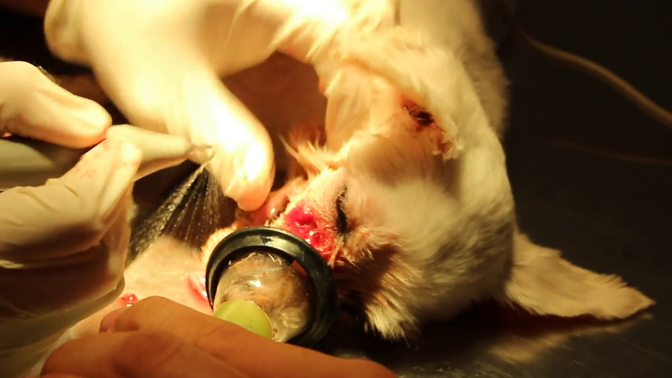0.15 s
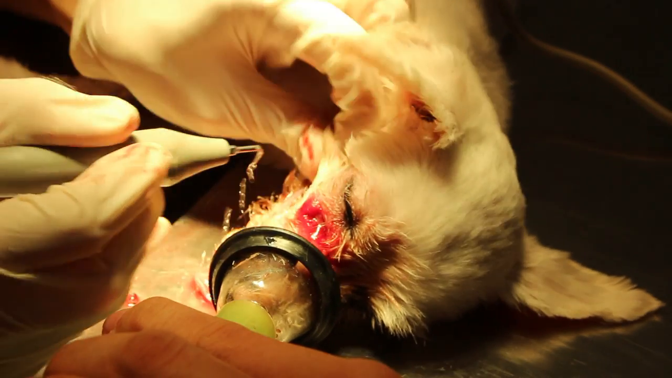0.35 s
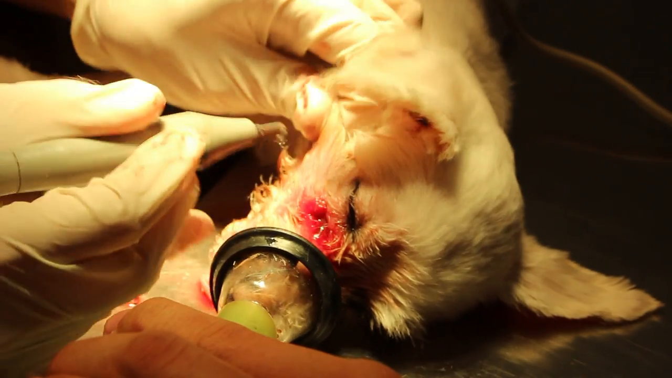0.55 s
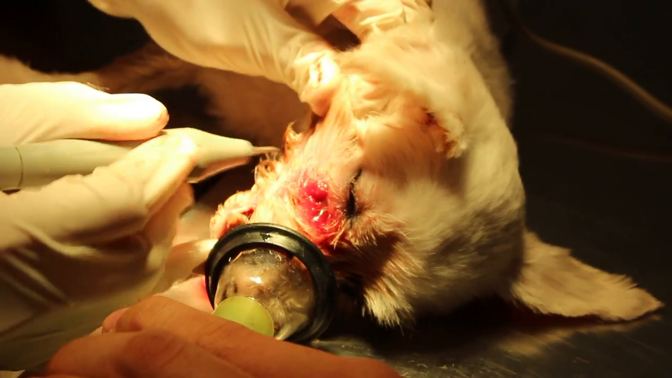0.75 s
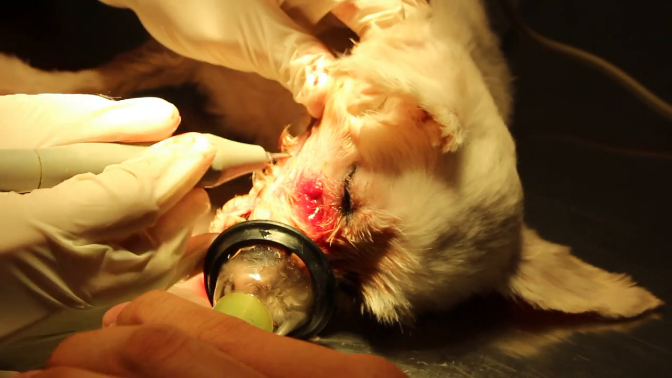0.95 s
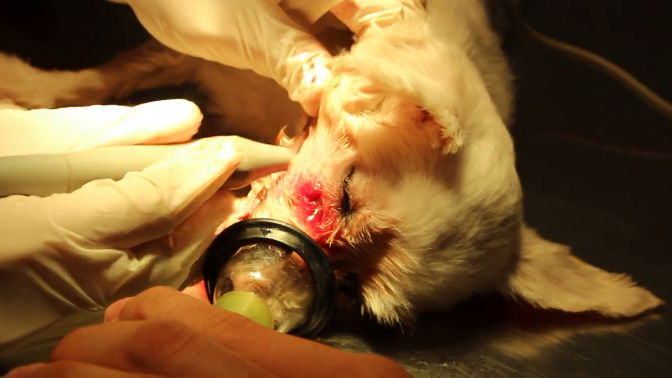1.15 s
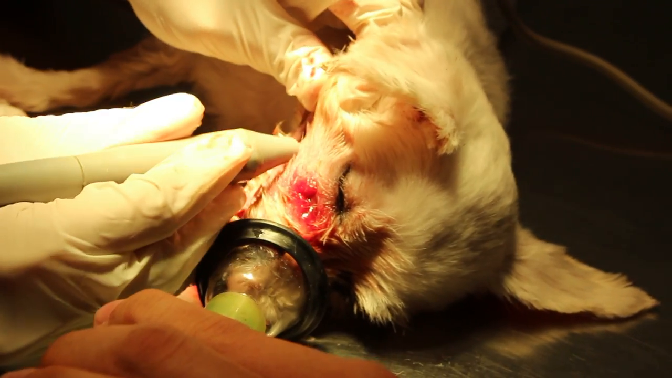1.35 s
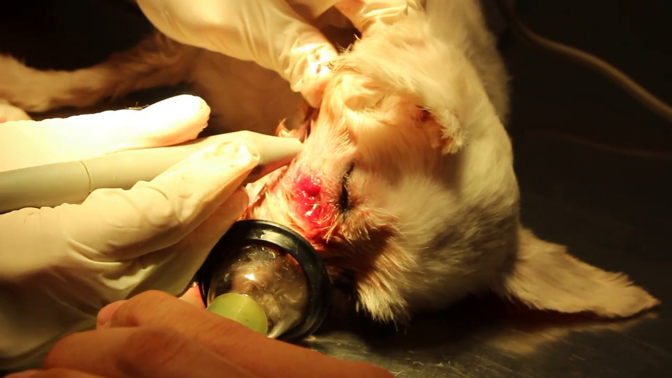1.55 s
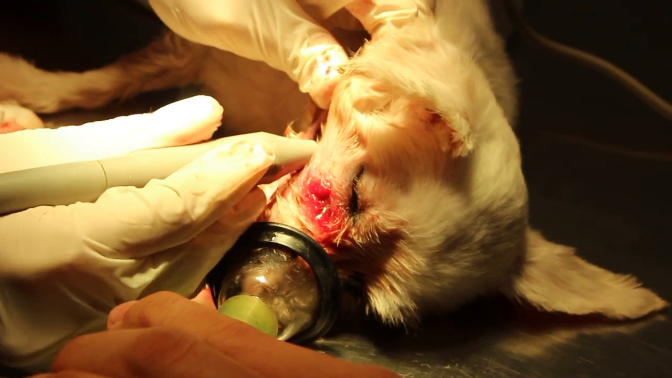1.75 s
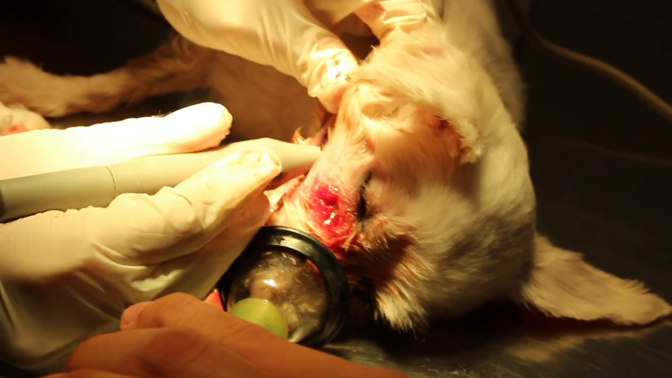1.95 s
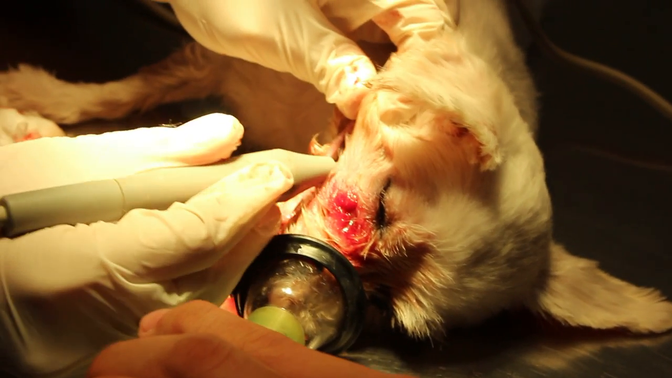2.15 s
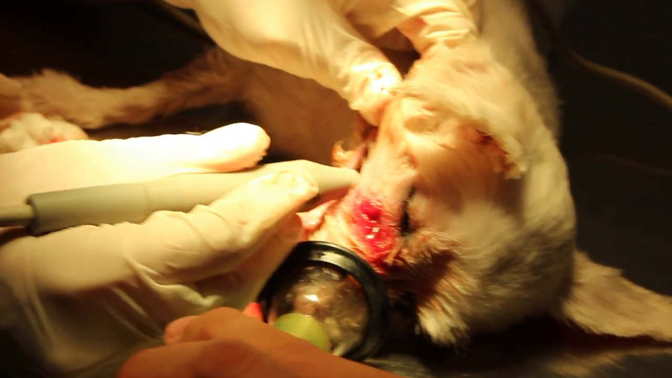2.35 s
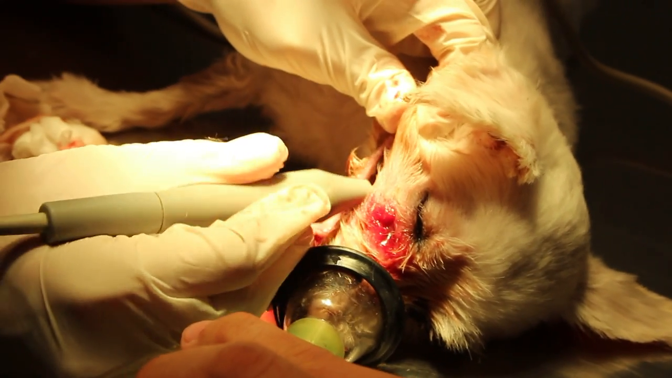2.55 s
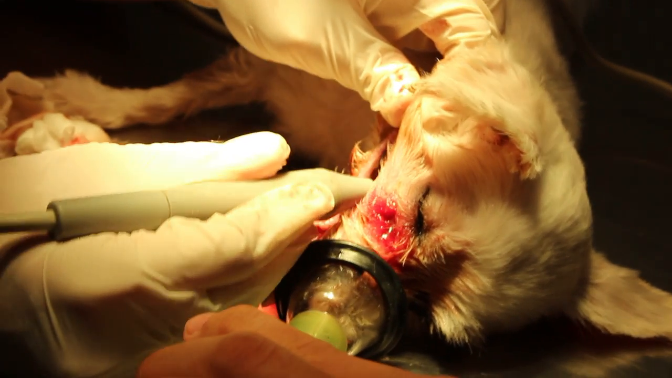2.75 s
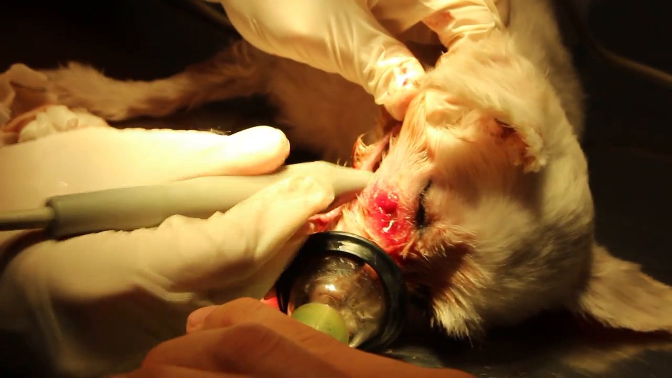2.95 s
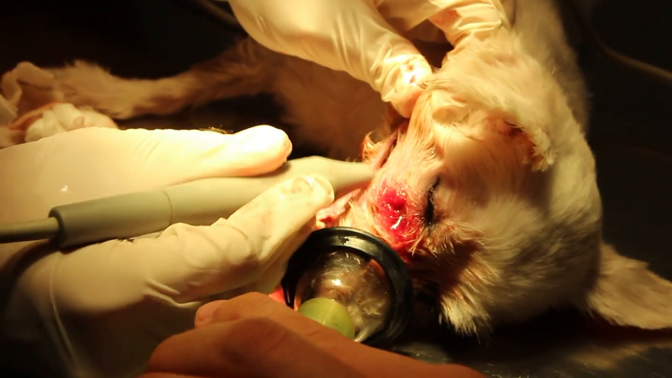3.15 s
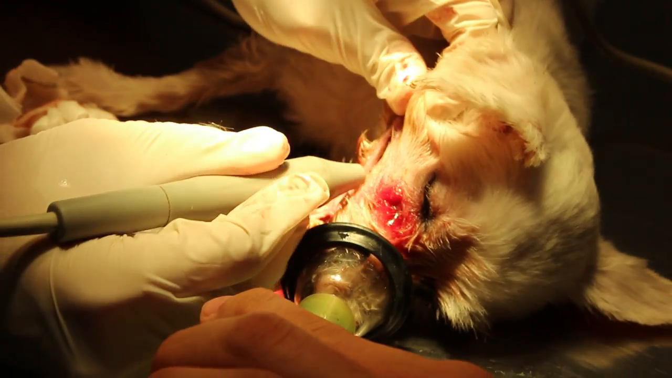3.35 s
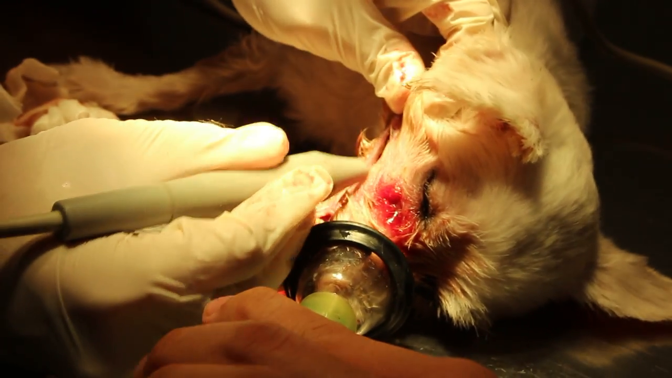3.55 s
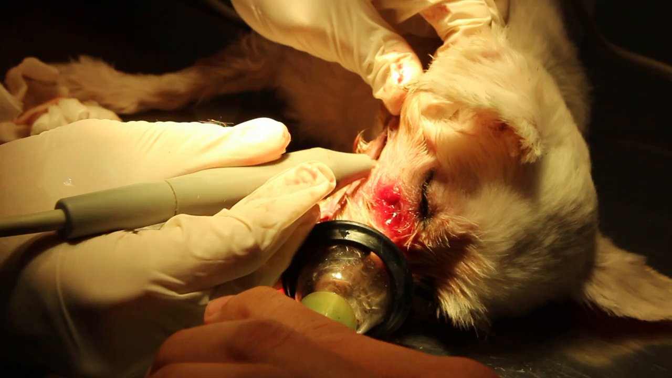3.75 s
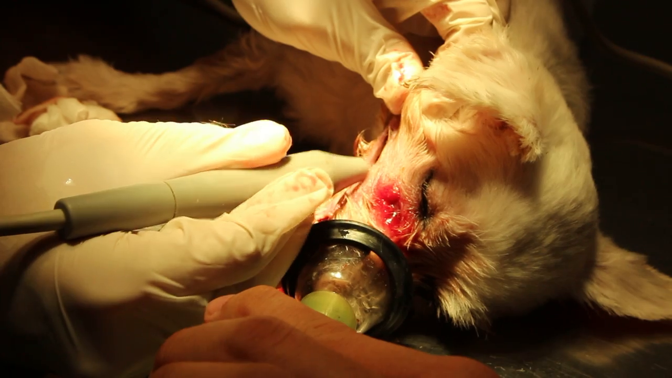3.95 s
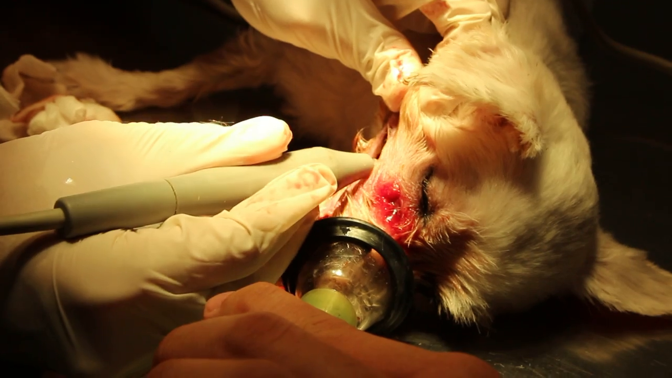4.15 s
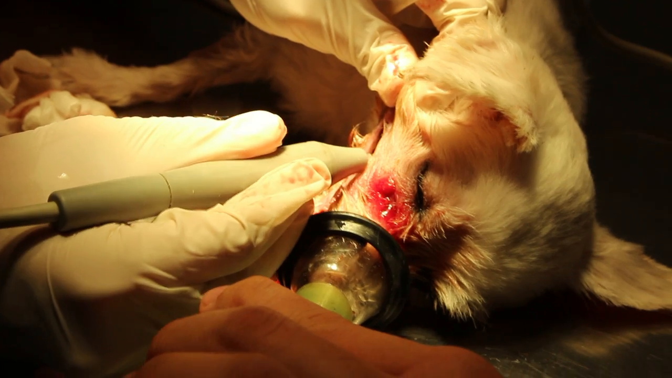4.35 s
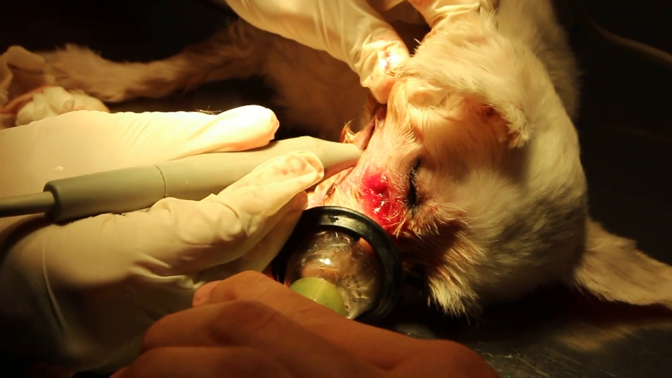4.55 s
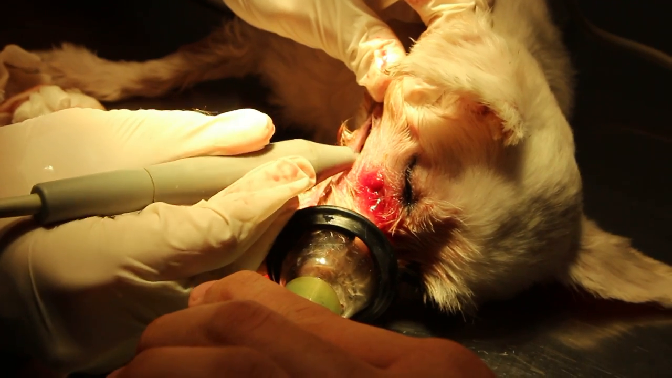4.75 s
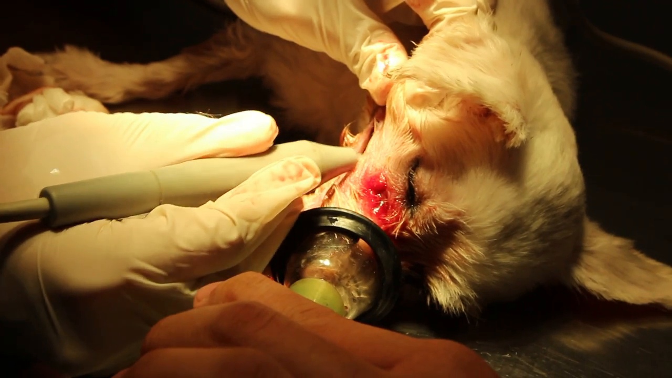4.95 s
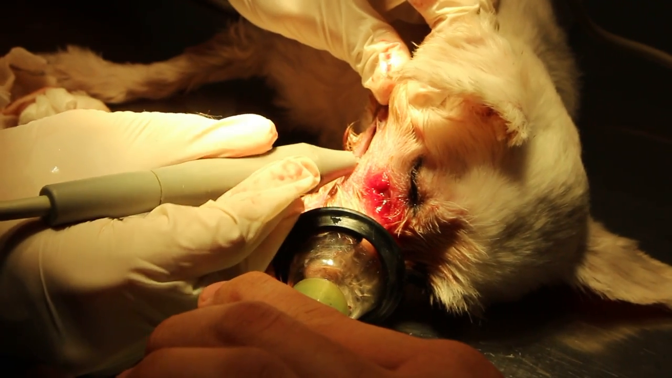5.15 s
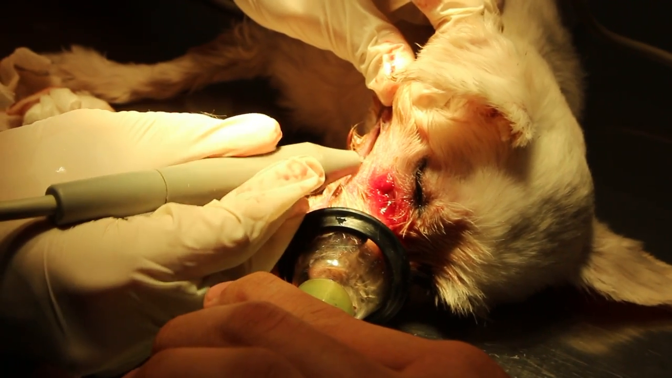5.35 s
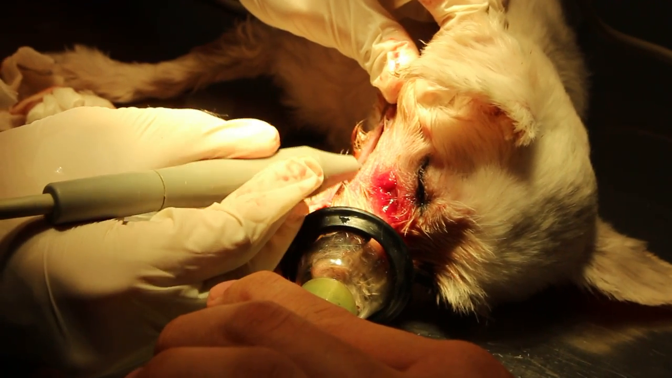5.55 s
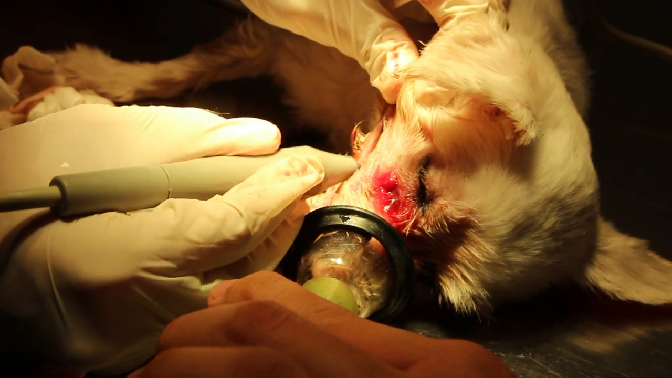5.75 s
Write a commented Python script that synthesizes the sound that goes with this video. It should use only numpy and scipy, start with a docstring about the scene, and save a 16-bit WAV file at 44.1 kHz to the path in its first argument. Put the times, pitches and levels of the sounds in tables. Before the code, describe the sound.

An ultrasonic dental scaler squeals, chatters and scrapes on teeth after a burst of water mist and pedal clacks, over low room hum.

```python
"""An ultrasonic dental scaler in a small tiled clinic room.
First ventilation and machines hum (shaped noise, all along) and a water mist (bright noise) dies away.
Foot pedal clacks follow (rings, thuds and snaps); at the second and third, close together, the mist bursts back.
From 1.2 s the steel tip chatters on the teeth: gliding tones squeal, noise rasps and rings the tip, a high
whine comes and goes, and the sound jumps as the tip catches; two more clacks fall during this."""
import sys
import numpy as np
from scipy import signal
from scipy.fft import rfft, irfft, next_fast_len
from scipy.io import wavfile
from scipy.ndimage import uniform_filter1d, map_coordinates

SR = 44100
rng = np.random.default_rng(int(sys.argv[2]) if len(sys.argv) > 2 else 0)


def int16_out(signal):
    """Quantize to a 16-bit WAV file."""
    q = np.round(np.clip(np.atleast_2d(signal).T, -1, 1) * 32767)
    wavfile.write(sys.argv[1], SR, q.astype(np.int16))


N = 255339  # length of the scene in samples


def amp(db):
    """Gain of a level in dB."""
    return 10 ** (np.asarray(db) / 20)


def unit(x):
    """x scaled to an rms (average strength) of 1."""
    return x / np.sqrt(np.mean(np.abs(x) ** 2) + 1e-20)


def along(points, hz):
    """Read a curve of (frequency, value) points at hz, on a log frequency axis."""
    f, v = np.transpose(points)
    return np.interp(np.log(hz + 1), np.log(f + 1), v)


def curves(rows):
    """One value per sample for each column after the time."""
    times, *columns = np.transpose(rows)
    return [np.interp(np.arange(N) / SR, times, column) for column in columns]


def wobble(rate, size=N):
    """A smooth random curve with rate random points a second."""
    points = rng.standard_normal(int(size * rate / SR) + 4)
    return map_coordinates(points, [np.arange(size) * rate / SR])


def filtered(x, response):
    """x times a complex response of frequency."""
    m = next_fast_len(N + SR // 2)
    return irfft(rfft(x, m) * response(np.fft.rfftfreq(m, 1 / SR)), m)[..., :N]


def hiss(spectrum, patchy_db, channels):
    """Coloured noise of rms 1, with random louder and softer patches in time and frequency."""
    z = signal.stft(rng.standard_normal((channels, N)), nperseg=256)[2]
    field = uniform_filter1d(rng.standard_normal(z.shape[1:]), size=3, axis=0)
    field = uniform_filter1d(field, size=8, axis=1)
    x = signal.istft(z * amp(patchy_db * unit(field)), nperseg=256)[1][:, :N]
    return unit(filtered(x, lambda hz: amp(along(spectrum, hz))))


def ports(pair, lean, lead):
    """Level and phase differences between the two microphone ports, half given to each side."""
    half = np.array([[.5], [-.5]])
    return filtered(pair, lambda hz: amp(half * along(lean, hz)) * np.exp(1j * half * along(lead, hz)))


# colour of the hum: (frequency [Hz], relative level [dB])
HUM_COLOUR = [(20, -35), (35, -16), (52, -12), (63, 2.5), (80, -5.5), (100, -7.5), (112, -7), (130, 4),
              (165, -12.5), (230, -10.5), (310, -13), (450, -13.5), (900, -20), (1600, -28.5),
              (5000, -37.5), (16000, -51.5)]
# likeness of the hum at the two ports: (frequency [Hz], likeness [0-1])
HUM_LIKENESS = [(60, 1), (300, 0.99), (800, 0.83), (1500, 0.98), (3000, 0)]
# level difference of the hum: (frequency [Hz], left minus right [dB])
HUM_LEVEL_DIFFERENCE = [(60, -1.5), (240, 2.5), (950, 2), (3770, -0.5), (15000, 0.0)]
# phase difference of the hum: (frequency [Hz], left minus right [rad])
HUM_PHASE_DIFFERENCE = [(50, 1), (130, 0.77), (300, 0.45), (700, 0.14)]


def hum():
    """Ventilation and machine rumble: noise nearly alike at both ports in the bass."""
    def turn(hz):
        return np.arccos(np.clip(along(HUM_LIKENESS, hz), 0, 1)) / 2
    noises = hiss(HUM_COLOUR, patchy_db=1.24, channels=2)
    # the more unlike the ports, the more of the second noise goes in with opposite signs
    mid, side = filtered(noises, lambda hz: [np.cos(turn(hz)), np.sin(turn(hz))])
    return amp(-39) * ports(np.array([mid + side, mid - side]), HUM_LEVEL_DIFFERENCE, HUM_PHASE_DIFFERENCE)


# strength of the water mist: (time [s], level [dB])
MIST_LEVEL = [(0.0, -42.5), (0.11, -42), (0.13, -38), (0.3, -65), (.45, -90), (1.035, -78), (1.05, -29),
              (1.1, -36), (1.19, -40.5), (1.4, -70), (5.79, -105)]
# colour of the water mist: (frequency [Hz], relative level [dB])
MIST_COLOUR = [(880, -40), (1500, -6), (2040, -2), (2300, -4), (2800, -1.5), (9190, -8.5), (16000, -22)]


def spray():
    """Fine water mist from the handpiece, a bright noise: it stops, then returns with the pedal."""
    return amp(curves(MIST_LEVEL)[0]) * hiss(MIST_COLOUR, patchy_db=.8, channels=2)


# pedal clacks: (time [s], level before a 4.5 dB cut of the dry sound [dB], ring pitch [Hz],
# snap against ring [dB], thud against ring [dB], room send against the uncut level [dB],
# time for the ring to fall 60 dB [s])
PEDAL_CLACKS = [(0.11, -31, 1033, -26, -6.5, 3.5, 0.037), (1.034, -28.5, 963, -3, -16, -1, 0.077),
                (1.044, -18, 1305, -13, -25, 2.5, 0.027), (1.447, -16, 1356, -20, -9, -5.5, 0.016),
                (3.449, -27, 1580, -20, -15, -3.5, 0.024)]


def pedal():
    """Plastic clacks: a short ring in two modes, a low thud and a broad snap; dry and as sent to the walls."""
    out = np.zeros((2, N + SR))
    t = np.arange(SR // 4) / SR
    for start, db, hz, snap_db, thud_db, room_db, fall_s in PEDAL_CLACKS:
        two_modes = np.sin(2 * np.pi * hz * t) + 0.43 * np.sin(2 * np.pi * 1.17 * hz * t)
        ring = two_modes * amp(-60 * t / fall_s)
        thud = amp(thud_db - 60 * t / 0.04) * np.sin(2 * np.pi * 450 * t)
        snap = amp(snap_db - 60 * t / 0.017) * rng.standard_normal(len(t))
        at = round(start * SR)
        out[:, at:at + len(t)] += amp([[db - 4.5], [db + room_db]]) * (ring + thud + snap)
    return out[:, :N]


# how long the walls ring: (frequency [Hz], time to fall 60 dB [s])
WALL_DECAY = [(300, 0.45), (1500, 0.49), (5000, 0.18), (14000, 0.038)]


def room(x, width):
    """Quick echoes off the steel table, then the walls, where each frequency dies at its own speed."""
    hz, t, z = signal.stft(rng.standard_normal((2, SR // 2)), SR, nperseg=256)
    walls = amp(-60 * t / along(WALL_DECAY, hz)[:, None])
    steel_table = amp(1 - 60 * t / 0.027)
    mid, side = signal.istft(z * (walls + steel_table), SR, nperseg=256)[1]
    tail = np.array([mid + width * side, mid - width * side])
    delayed = np.pad(x, (60, 0))[None]  # samples
    return signal.fftconvolve(delayed, tail / np.linalg.norm(tail[0]), axes=1)[:, :N]


def squeal(hz, db, smear, drift_hz, blur_hz):
    """A tone that drifts and flutters; chaotic contact blurs it into a narrow noise."""
    n = len(smear)
    pitch = hz + drift_hz * (.3 + 1.4 * smear) * wobble(60, size=n)
    carrier = np.exp(2j * np.pi * np.cumsum(pitch) / SR)
    flutter = unit(amp(3.3 * wobble(110, size=n)))
    blur = unit(wobble(blur_hz, size=n) + 1j * wobble(blur_hz, size=n))
    mixture = np.sqrt(1 - smear) * flutter + np.sqrt(smear) * blur
    return np.sqrt(2) * amp(db) * np.real(carrier * mixture)


# squeals of the tip, each one gliding tone:
# (start [s], length [s], first pitch [Hz], last pitch [Hz], level [dB])
TIP_SQUEALS = [(1.201, 0.022, 3140, 3123, -27.5), (1.2, 0.026, 7610, 7830, -19),
               (1.197, 0.047, 10890, 10880, -25.5), (1.244, 0.055, 7700, 7700, -39),
               (1.268, 0.04, 7820, 7840, -31), (1.27, 0.038, 3310, 3250, -40),
               (1.315, 0.058, 7580, 7750, -22), (1.318, 0.065, 3270, 3370, -34.5),
               (1.334, 0.047, 11000, 10990, -25.5), (1.384, 0.074, 7680, 7640, -20),
               (1.391, 0.15, 3320, 3330, -35), (1.417, 0.16, 11070, 10880, -30),
               (1.472, 0.045, 7650, 7690, -21), (1.556, 0.12, 7690, 7735, -17.5),
               (1.562, 0.14, 3250, 3150, -27.5), (1.571, 0.13, 10940, 10960, -23.5),
               (1.579, 0.031, 7350, 7460, -24), (1.677, 0.046, 3164, 3263, -31.5),
               (1.68, 0.042, 7690, 7710, -20.5), (1.719, 0.065, 3720, 3700, -36.5),
               (1.761, 0.027, 7700, 7640, -25), (2.002, 0.044, 4390, 4410, -37.5),
               (2.136, 0.062, 9900, 9900, -31), (2.212, 0.093, 7040, 7030, -35),
               (2.216, 0.055, 7990, 7900, -30.5), (2.242, 0.15, 11120, 11120, -25.5),
               (2.272, 0.03, 7700, 7680, -22), (2.292, 0.077, 7374, 7575, -18),
               (2.335, 0.048, 3550, 3980, -31), (2.39, 0.027, 7480, 7490, -33),
               (2.403, 0.046, 6500, 6590, -26.5), (2.409, 0.027, 3266, 3310, -32),
               (2.458, 0.041, 6940, 6880, -27), (2.504, 0.03, 7070, 6950, -39),
               (2.516, 0.066, 8400, 8260, -33), (2.596, 0.031, 10100, 9700, -28),
               (2.63, 0.033, 7740, 8070, -29), (2.632, 0.06, 4160, 4130, -27),
               (2.748, 0.043, 3960, 3980, -30), (2.756, 0.057, 10000, 10100, -33),
               (2.853, 0.052, 7180, 7370, -29), (2.89, 0.036, 6900, 6910, -23.5),
               (2.948, 0.035, 10000, 9780, -24), (2.953, 0.049, 6860, 6850, -27.5),
               (2.976, 0.027, 9100, 9330, -26), (3.15, 0.034, 6960, 6840, -19.5),
               (3.154, 0.027, 7870, 7900, -25), (3.184, 0.02, 7470, 7630, -29),
               (3.19, 0.095, 11670, 11440, -37.5), (3.294, 0.034, 7680, 7600, -28),
               (3.297, 0.042, 10640, 10960, -33), (3.307, 0.034, 3110, 3115, -30),
               (3.347, 0.046, 7880, 8000, -21), (3.377, 0.047, 8500, 8360, -26),
               (3.387, 0.1, 10800, 10810, -29.5), (3.413, 0.039, 7900, 8000, -29),
               (3.405, 0.041, 2970, 2960, -29.5), (3.55, 0.045, 7420, 7380, -23),
               (3.556, 0.044, 3426, 3410, -29), (3.59, 0.036, 7900, 7800, -29),
               (3.642, 0.07, 6960, 6870, -30.5), (3.699, 0.035, 10590, 10770, -27.5),
               (3.7, 0.042, 2947, 3106, -31), (3.705, 0.039, 8200, 8140, -24),
               (3.769, 0.058, 7600, 7700, -34), (3.832, 0.094, 4250, 4460, -33.5),
               (3.89, 0.058, 6910, 6820, -27), (3.915, 0.047, 11420, 11300, -27),
               (3.929, 0.13, 3334, 3093, -29.5), (3.977, 0.029, 7660, 7780, -20),
               (3.983, 0.031, 10970, 10840, -28.5), (4.028, 0.037, 7600, 7630, -34),
               (4.053, 0.069, 8750, 8580, -30), (4.11, 0.07, 8550, 8400, -35),
               (4.177, 0.11, 11500, 11480, -32), (4.191, 0.1, 6860, 6900, -28),
               (4.221, 0.047, 8130, 8220, -26), (4.229, 0.053, 3440, 3435, -27),
               (4.268, 0.035, 7320, 7220, -20.5), (4.265, 0.04, 11130, 11070, -24),
               (4.298, 0.047, 3880, 3570, -28), (4.334, 0.031, 11430, 11420, -28.5),
               (4.354, 0.076, 6890, 6910, -26.5), (4.373, 0.17, 11430, 11530, -28),
               (4.407, 0.067, 3140, 3095, -28), (4.422, 0.15, 6560, 6700, -30.5),
               (4.476, 0.053, 8550, 8280, -24), (4.481, 0.044, 3090, 3210, -25.5),
               (4.522, 0.086, 11340, 11370, -30.5), (4.532, 0.086, 3300, 3320, -28.5),
               (4.58, 0.0377, 3810, 4000, -33), (4.65, 0.051, 9820, 9800, -31),
               (4.714, 0.083, 3314, 3140, -28), (4.718, 0.058, 7650, 7750, -18.5),
               (4.719, 0.067, 10900, 10680, -32), (4.787, 0.117, 11350, 11370, -27),
               (4.804, 0.088, 6990, 6800, -21.5), (4.928, 0.19, 11460, 11450, -30),
               (4.933, 0.045, 8100, 8210, -23.5), (4.941, 0.065, 3420, 3490, -23),
               (5.009, 0.089, 6540, 6570, -32.5), (5.021, 0.042, 3280, 3340, -32),
               (5.049, 0.046, 6910, 6910, -27.5), (5.072, 0.021, 7600, 7550, -28.5),
               (5.075, 0.022, 8000, 7950, -29), (5.078, 0.044, 3740, 3820, -22),
               (5.099, 0.025, 7700, 7770, -33), (5.141, 0.047, 3900, 3946, -32.5),
               (5.226, 0.031, 4750, 4790, -27.5), (5.232, 0.048, 11710, 11900, -35),
               (5.25, 0.04, 3910, 3990, -27.5), (5.362, 0.044, 8700, 8700, -31),
               (5.4, 0.036, 8970, 8910, -32), (5.402, 0.031, 11860, 11590, -31),
               (5.424, 0.035, 7310, 7200, -25.5), (5.44, 0.045, 11440, 11450, -29),
               (5.444, 0.056, 3850, 3860, -29), (5.464, 0.088, 6660, 6620, -28.5),
               (5.478, 0.032, 7730, 7560, -19.5), (5.562, 0.057, 7150, 7290, -20),
               (5.579, 0.06, 3850, 3950, -35.5), (5.701, 0.04, 7810, 7780, -26),
               (5.704, 0.05, 10770, 11010, -32.5), (5.71, 0.064, 3080, 3130, -35.5),
               (5.75, 0.038, 7820, 7880, -30)]


def squeals(smear):
    """Every squeal swells, holds while it glides, and fades; summed as low, middle and high tones."""
    swell_s, longest_s = .05, .4  # room for a squeal's swell, and for all of it
    n = round(longest_s * SR)
    out = np.zeros((3, N + n))
    smear = np.pad(smear, (0, n), "edge")
    t = np.arange(n) / SR - swell_s
    for start, length, first_hz, last_hz, db in TIP_SQUEALS:
        at = round((start - swell_s) * SR)
        # swells at 702 dB/s and fades at 800 dB/s
        level = db + 702 * np.minimum(t, 0) - 800 * np.maximum(t - length, 0)
        glide = np.interp(t, [0, length], [first_hz, last_hz])
        blurred = np.clip(1.1 * smear[at:at + n] - .15, 0, 1)
        band = np.searchsorted([5000, 8000], first_hz)
        out[band, at:at + n] += squeal(glide, level, blurred, drift_hz=34.1, blur_hz=450.2)
    return out[:, :N]


def mixed_tones(low_tone, main_tone):
    """One-sided contact adds doubles, sums and differences of the two chief tones, kept above 3500 Hz."""
    return amp(-2) * filtered((low_tone + 0.48 * main_tone) ** 2, lambda hz: hz > 3500)


# scrapes of the tip over tartar: (middle [s], length [s], low rasp level [dB], high rasp level [dB])
TARTAR_SCRAPES = [(1.207, 0.05, -41, -31), (1.287, 0.076, -39, -32.5), (1.415, 0.11, -39.5, -37),
                  (1.547, 0.083, -38.5, -38), (1.657, 0.033, -44, -42), (1.76, 0.041, -36.5, -30),
                  (1.867, 0.046, -30, -26), (2.005, 0.026, -52, -33), (2.06, 0.08, -39, -31),
                  (2.16, 0.036, -37, -30), (2.258, 0.062, -44.5, -35), (2.501, 0.096, -27, -26),
                  (2.597, 0.35, -29.5, -27), (2.683, 0.145, -30.5, -31), (2.813, 0.032, -29.5, -26.5),
                  (2.898, 0.062, -28, -29), (2.999, 0.12, -30, -28), (3.097, 0.06, -37, -32),
                  (3.192, 0.095, -39.5, -27), (3.321, 0.04, -42, -37), (3.433, 0.12, -34, -25),
                  (3.586, 0.097, -30, -23), (3.729, 0.066, -34.5, -29), (3.915, 0.096, -34, -33),
                  (4.083, 0.1, -47, -28), (4.154, 0.083, -36.5, -34), (4.317, 0.11, -33, -30.5),
                  (4.472, 0.15, -34.5, -30.5), (4.583, 0.032, -33, -27.5), (4.714, 0.059, -36.5, -33),
                  (4.874, 0.093, -35, -33.5), (4.976, 0.067, -38, -30.5), (5.106, 0.111, -29.5, -28),
                  (5.257, 0.088, -29.5, -25.5), (5.4, 0.05, -38, -35), (5.479, 0.087, -29, -25.5),
                  (5.619, 0.089, -34, -29), (5.752, 0.076, -37, -30)]


def rasp_db():
    """Levels of the low and the high rasp: a resting level plus one rounded hump for each scrape."""
    t = np.arange(0, N / SR, 1 / 1000)
    middle, length, *tops = np.transpose(TARTAR_SCRAPES)[..., None]
    hump = -5 * abs(2 * (t - middle) / length) ** 2  # 5 dB down at a scrape's ends
    levels = []
    for top, resting_db in zip(tops, (-43.5, -38.5)):
        power = np.sum(amp(top + hump) ** 2, axis=0) + amp(resting_db) ** 2
        levels.append(10 * np.log10(power))
    return curves(np.transpose([t, *levels]))


# colour of the low rasp: (frequency [Hz], relative level [dB])
LOW_RASP_COLOUR = [(300, -64), (750, -23.5), (1300, -14.5), (2000, -9), (2600, -0.5), (3300, -1), (4100, 0),
                   (5000, -8), (6000, -19), (9000, -45)]
# colour of the high rasp: (frequency [Hz], relative level [dB])
HIGH_RASP_COLOUR = [(3500, -34), (5200, -13), (6000, -3.5), (6900, 2.5), (7800, 4), (8800, 1.5),
                    (10000, -4.5), (11200, -11), (12500, -7.5), (14500, -11), (16000, -19)]


def rasps(low_db, high_db):
    """Scraping noise in a low and a high band; uneven bounces shake both together."""
    grit_db = 0.7 * wobble(40) + 1.44 * wobble(400)
    low = amp(low_db + grit_db) * hiss(LOW_RASP_COLOUR, patchy_db=4.0, channels=1)[0]
    high = amp(high_db + grit_db) * hiss(HIGH_RASP_COLOUR, patchy_db=2.5, channels=1)[0]
    return low + high


# weaker modes of the steel tip: (pitch [Hz], width of one resonance pass [Hz], level [dB])
STEEL_MODES = [(4320, 56, -5.5), (5950, 93, 7), (6066, 130, 9), (6450, 90, -2), (6930, 27, 10),
               (8900, 28, -4.5), (9400, 30, -1), (12550, 79, 7), (12600, 70, -1)]


def ringing_modes(high_db, smear):
    """Noise that follows the high rasp rings the tip's weaker modes, less so in chaotic contact."""
    def modes(f):
        # squared: each resonance is passed twice
        return sum(amp(db) * (1j * f * width / (centre * centre - f * f + 1j * f * width)) ** 2
                   for centre, width, db in STEEL_MODES)
    flat_noise = hiss([(20, 0), (20000, 0)], patchy_db=8.5, channels=1)[0]
    knocks = amp(0.33 * high_db - 12.0 * smear - 14.5) * flat_noise
    return filtered(knocks, modes)


# faint lasting tones of the tip: (pitch [Hz], wander [Hz], level [dB], unsteadiness [dB])
TIP_UNDERTONES = [(3254, 120, -41, 5), (3900, 260, -48.5, 6), (6920, 220, -38, 4.5), (7510, 180, -41.5, 8),
                  (8360, 270, -44.5, 8), (10855, 100, -43, 5), (11350, 130, -44.5, 3.5)]


def undertones(high_db, smear):
    """Faint wandering tones that the tip keeps sounding, a little louder when the high rasp is."""
    follow_db = 0.35 * (high_db - high_db.mean())
    total = 0
    for hz, wander_hz, db, swing_db in TIP_UNDERTONES:
        pitch = hz + wander_hz * wobble(9)
        level = db + swing_db * wobble(14) + follow_db
        total = total + squeal(pitch, level, smear, drift_hz=44.94, blur_hz=449)
    return total


# whine at half the drive frequency: (time [s], level [dB])
WHINE_LEVEL = [(1.2, -37), (1.25, -62), (1.72, -51), (1.85, -70), (2.09, -32), (2.2, -52), (2.89, -53),
               (2.93, -29), (3.28, -63), (3.35, -42), (3.9, -51), (4.15, -26), (4.22, -43), (4.56, -36.5),
               (4.84, -59), (4.89, -35), (5.37, -35), (5.79, -61)]


def half_drive_whine(smear):
    """A very high whine at half the ultrasonic drive frequency."""
    half_drive_hz = 14810
    return squeal(half_drive_hz, curves(WHINE_LEVEL)[0], 0.83 * smear, drift_hz=19.7, blur_hz=420)


# moments when the tip, having lifted, catches the tooth again: (time [s], jump [dB])
TOOTH_CATCHES = [(1.267, 22), (1.562, 5), (1.685, 7), (1.825, 12), (1.988, 9), (2.156, 9), (2.213, 8),
                 (2.866, 11), (3.151, 15), (3.299, 15.5), (3.559, 6), (3.706, 12), (3.77, 9), (3.824, 8.5),
                 (3.979, 9), (4.413, 8), (4.72, 2), (5.238, 5.5), (5.403, 7.5), (5.71, 18)]


def catching():
    """Gain of the contact: it fades as the tip lifts and jumps when it catches; silent before 1.199 s."""
    t = np.arange(0, N / SR, 1 / 1000)
    db = sum(jump * np.where(t < s, -.6, .4) * np.exp(-abs(t - s) / 0.019) for s, jump in TOOTH_CATCHES)
    first_touch = np.clip((np.arange(N) / SR - 1.199) / 0.0044, 0, 1)
    return amp(curves(np.transpose([t, db]))[0]) * first_touch


# steadiness of the contact: (time [s], smear [0 clean - 1 chaotic])
CONTACT_SMEAR = [(1.2, 0.62), (1.74, 0.092), (1.8, 0.49), (2.15, 1), (2.22, 0.16), (2.37, 0.27),
                 (2.42, 0.77), (3.1, 0.59), (3.3, 0.44), (3.55, 0.88), (3.7, 0.66), (4.65, 0.57),
                 (4.75, 0.18), (5.05, 0.47), (5.2, 0.69), (5.65, 1), (5.72, .32), (5.79, .6)]


def scaler():
    """The tip bounces only every few drive cycles, so fractions of the ultrasonic drive become audible."""
    smear = np.clip(curves(CONTACT_SMEAR)[0], 0, 1)
    low_tone, main_tone, high_tone = squeals(smear)
    low_db, high_db = rasp_db()
    tones = low_tone + main_tone + high_tone + mixed_tones(low_tone, main_tone)
    tones = tones + undertones(high_db, smear) + half_drive_whine(smear)
    return catching() * (tones + rasps(low_db, high_db) + ringing_modes(high_db, smear))


def swaying(pair, samples):
    """The moving tip keeps shifting its path difference to the two ports."""
    shift = samples * wobble(60)
    return np.array([map_coordinates(x, [np.arange(N) + way * shift]) for x, way in zip(pair, (.5, -.5))])


# level difference of the tip: (frequency [Hz], left minus right [dB])
TIP_LEVEL_DIFFERENCE = [(1000, 0), (3000, -2), (5000, 0.5), (8000, 3.5), (15000, -0.5)]
# phase difference of the tip: (frequency [Hz], left minus right [rad])
TIP_PHASE_DIFFERENCE = [(1000, -4), (4000, 0.47), (8000, 0.75), (11000, 2), (15000, 1.9)]
# share of the tip sent to the room: (frequency [Hz], level [dB])
TIP_ROOM_SHARE = [(1000, -4), (2500, -7), (5000, 0), (8000, -3), (12000, 0.5)]
# the hand turns the tip: (time [s], left minus right [dB])
TIP_TURNING = [(1.2, 0.5), (1.45, 3.5), (1.65, 1), (2.3, 1), (2.44, 1.5), (3.49, 1), (3.8, 1.5),
               (4.47, 0.5), (5.79, 1)]


def tip_in_room():
    """The tip heard directly and by its echoes, leaning left and right as the hand turns it."""
    tip = scaler()
    near = swaying(ports(np.array([tip, tip]), TIP_LEVEL_DIFFERENCE, TIP_PHASE_DIFFERENCE), samples=0.76)
    echoes = room(filtered(tip, lambda hz: amp(along(TIP_ROOM_SHARE, hz))), width=0.52)
    return (near + echoes) * amp(np.array([[.5], [-.5]]) * curves(TIP_TURNING)[0])


def scene():
    """Hum and mist, the pedal down at the floor and mostly heard off the walls, and the tip close by."""
    clacks, far_clacks = pedal()
    return hum() + spray() + clacks + room(far_clacks, width=0.33) + tip_in_room()


def record(dry):
    """A gentle gain control ducks loud sound, peaks are rounded off, nothing passes above the band limit."""
    top_hz = 15850
    loud = np.sqrt(np.abs(uniform_filter1d(np.mean(dry ** 2, axis=0), size=1200)))
    ducked = dry * uniform_filter1d((1 + loud / amp(-5.5)) ** -.4, size=900)
    rounded = ducked / (1 + np.abs(ducked / .7) ** 4) ** (1 / 4)
    return filtered(rounded, lambda hz: hz < top_hz)


dry = scene()
out = record(dry)
int16_out(out)
```